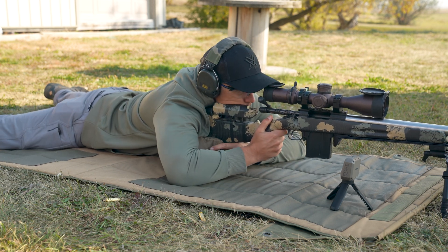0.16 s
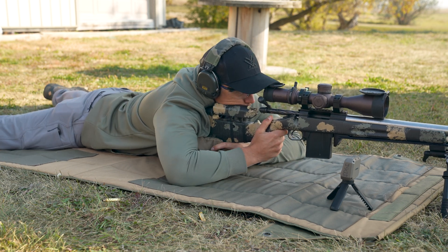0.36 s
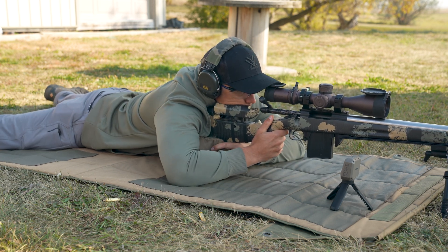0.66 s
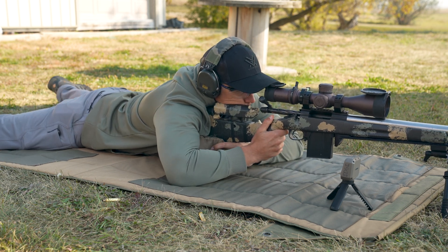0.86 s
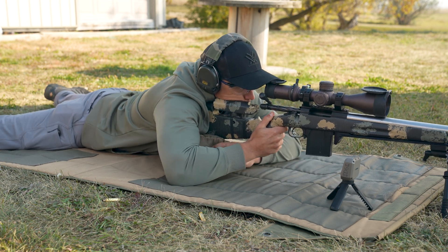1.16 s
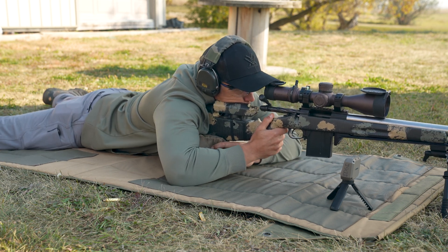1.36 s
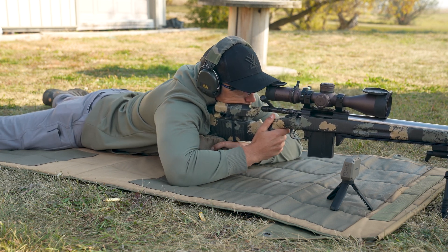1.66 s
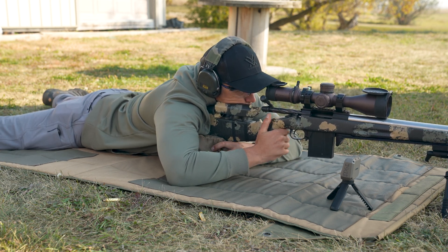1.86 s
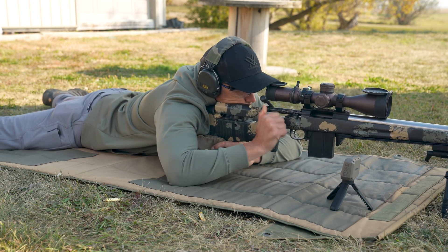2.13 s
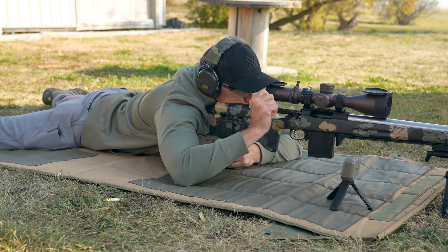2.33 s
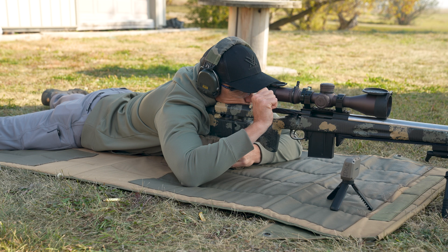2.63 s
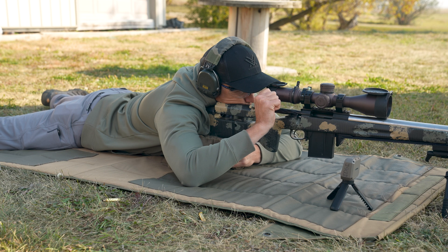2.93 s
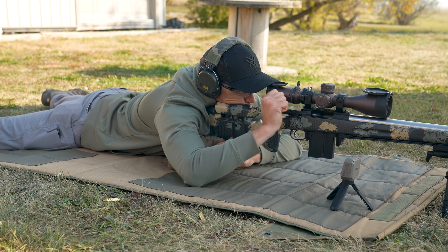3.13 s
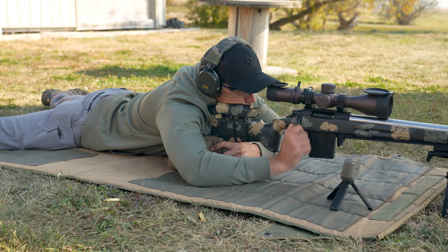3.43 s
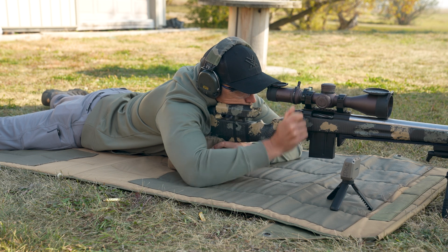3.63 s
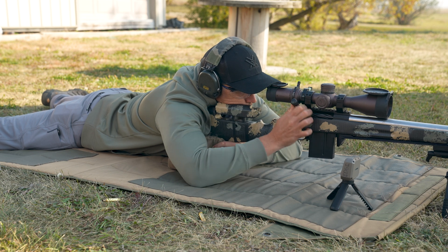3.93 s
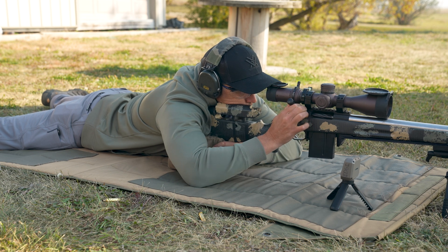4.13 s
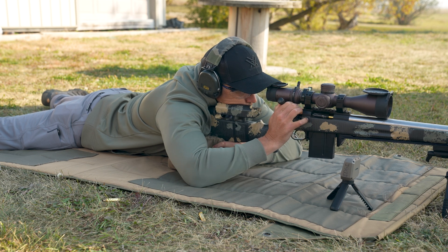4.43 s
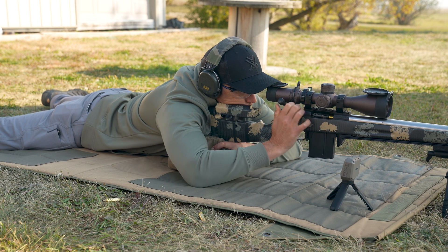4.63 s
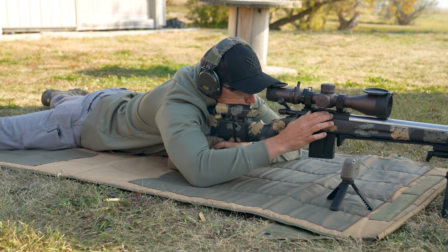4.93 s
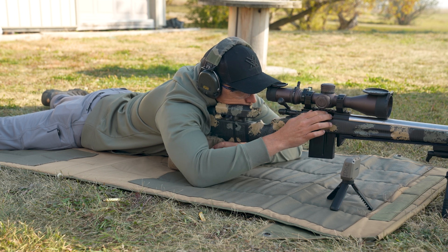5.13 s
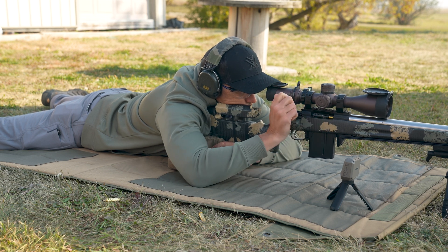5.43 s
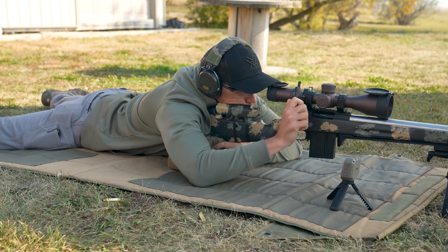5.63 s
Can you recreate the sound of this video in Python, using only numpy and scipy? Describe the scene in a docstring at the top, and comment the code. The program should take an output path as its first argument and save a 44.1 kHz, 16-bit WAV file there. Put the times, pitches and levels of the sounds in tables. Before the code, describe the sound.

A shooter lying on a mat handles a rifle close to the microphone. Mostly quiet at first: dull breeze, cloth dragging, faint fingertip taps. Then crisp steel snaps and a short rasping slide as the bolt is cycled, the loudest moment slightly overloaded. A small click comes soon after, a quiet gap, and finally two tight groups of metallic clacks. Open air, almost no echo.

```python
"""Working a rifle bolt outdoors

A prone shooter at an outdoor range works the bolt of a rifle, close to the microphone, and later works it again.
Each steel contact is a burst of micro-impacts that excites damped modes of stock, bolt and receiver.
The sliding bolt and the sleeve are stick-slip friction: noise of uneven strength, coloured by filters.
Fingers tick on the rifle between the clacks, and a faint outdoor rumble, filtered noise, lies beneath.
"""
import sys
import numpy as np
from scipy import signal
from scipy.fft import rfft, irfft, next_fast_len
from scipy.io import wavfile
from scipy.ndimage import uniform_filter1d

SR = 44100
rng = np.random.default_rng(int(sys.argv[2]) if len(sys.argv) > 2 else 0)


def materialize(psi):
    """Save the field psi as 16-bit PCM at rate SR to the path in sys.argv[1].

    A 1-D psi becomes a single channel; in a 2-D psi each row is a channel.
    """
    bounded = np.clip(np.atleast_2d(psi).T, -1, 1)
    quanta = np.round(bounded * 32767).astype(np.int16)
    wavfile.write(sys.argv[1], SR, quanta)


N = 254898  # length in samples


def from_db(db):
    """Logarithmic level: decibels to amplitude gain."""
    return 10 ** (np.asarray(db) / 20)


def rms_one(x):
    """Normalisation: scale a signal to unit rms."""
    return x / np.sqrt(np.mean(x ** 2) + 1e-20)


def filtered(x, kind, hz, order):
    """Linear filtering: a causal Butterworth filter."""
    return signal.sosfilt(signal.butter(order, hz, kind, fs=SR, output="sos"), x)


def band(x, low_hz, high_hz, order=2):
    """Band limitation: keep what lies between two frequencies."""
    return filtered(x + 1e-18, "band", [low_hz, min(high_hz, .45 * SR)], order)


def coloured(x, spectrum):
    """Spectral shaping: give a noise a smooth spectrum and unit rms."""
    hz, db = np.transpose(spectrum)
    size = next_fast_len(N)
    f = np.maximum(np.fft.rfftfreq(size, 1 / SR), 1)
    gain = from_db(np.interp(np.log(f), np.log(hz), db))
    gain = gain * np.minimum(f / hz[0], 1) ** 2  # falls off below the lowest listed frequency
    return rms_one(irfft(rfft(x, size) * gain, size)[:N])


def grainy(grain_db, grain_s):
    """Stick-slip friction: noise whose strength jumps as asperities catch and let go."""
    catch = rms_one(uniform_filter1d(rng.standard_normal(N), max(int(grain_s * SR), 1)))
    strength = from_db(grain_db * np.clip(catch, -2, 2))
    return rms_one(rng.standard_normal(N) * strength)


def resonance(x, hz, width_hz):
    """Damped resonance: a two-pole filter with gain 1 at its peak."""
    r = np.exp(-np.pi * width_hz / SR)
    numerator = np.array([1, 0, -1]) * (1 - r * r) / 2
    return signal.lfilter(numerator, [1, -2 * r * np.cos(2 * np.pi * hz / SR), r * r], x + 1e-18)


def add(track, s, sound):
    """Superposition: mix a short sound into a track at a time."""
    i = round(s * SR)
    track[i:i + len(sound)] += sound[:max(N - i, 0)]


def swells(times, levels_db, rises_s, falls_s, hold_s):
    """Exponential growth and decay: gain of movements that each speed up, hold and die away."""
    t, gain = np.arange(N) / SR, np.zeros(N)
    for s, db, rise, fall in zip(times, levels_db, rises_s, falls_s):
        distance = np.maximum((s - t) / rise, (t - s - hold_s) / fall)
        gain += from_db(db - 20 * np.clip(distance, 0, 10))
    return gain


# Spectrum of the open air. Each row: frequency in Hz, relative density in dB per Hz.
OUTDOOR_SPECTRUM = [(25, -7), (70, -9), (130, -7.5), (200, -12), (300, -20), (430, -17.5), (700, -22),
                    (1400, -32), (3000, -32.5), (8000, -36.5), (16000, -38)]
OUTDOORS_DB = -56


def outdoor_air():
    """Stationary random noise: the open air is a steady coloured noise."""
    return from_db(OUTDOORS_DB) * coloured(rng.standard_normal(N), OUTDOOR_SPECTRUM)


# Spectrum shared by breeze and mat. Each row: frequency in Hz, relative density in dB per Hz.
RUMBLE_SPECTRUM = [(15, -41), (25, -5.5), (70, -1.5), (156, -10), (388, -10.5), (659, -22.5), (718, -24.5),
                   (1500, -28.5), (1950, -66), (3300, -120)]
BREEZE_DB = -56


def rumble(mat):
    """Addition of power: a steady breeze and the arm moving on the mat share one low noise."""
    return np.hypot(mat, from_db(BREEZE_DB)) * coloured(rng.standard_normal(N), RUMBLE_SPECTRUM)


# Shifts of the shooter's arm. Each row: time of fastest movement in seconds, rustle level in dB,
# rustle treble in dB over that, rumble on the mat in dB, rise and fall in seconds per 20 dB.
ARM_MOVES = [(.1, -59.5, -5, -47, 0.19, 0.22), (.42, -62, 3, -49, 1, 0.94),
             (1.038, -50.5, 4, -61, .11, 0.12), (1.22, -59, -2.5, -57, 0.39, 1.6),
             (1.84, -70, 4, -54, .25, 0.03), (2.46, -51, -11, -49.5, 0.27, 0.23),
             (3.29, -70.5, -0.5, -48.5, .12, 1.36), (3.87, -61, -3.5, -59.5, .15, 0.2),
             (4.19, -59.5, -6, -62.5, .1, 0.4), (5.7, -56, 0, -47, .4, 2)]
MOVE_HOLD_S = .008


def arm_moves():
    """Common cause: each move of the arm drives rustle, treble of the rustle, and mat rumble together."""
    times, rustle_db, treble_db, mat_db, rise_s, fall_s = np.transpose(ARM_MOVES)
    levels = (rustle_db, rustle_db + treble_db, mat_db)
    return [swells(times, db, rise_s, fall_s, MOVE_HOLD_S) for db in levels]


# Spectrum of dragged cloth. Each row: frequency in Hz, relative density in dB per Hz.
CLOTH_SPECTRUM = [(150, 3.5), (500, 10), (1500, -1.5), (2900, 0), (5000, -7.5), (10000, -6.5),
                  (15000, -14.5)]
SLEEVE_REST_DB = -69.5  # the cloth never lies quite still
SLEEVE_TREBLE_HZ = 4200  # above this the rustle has its own level for each move


def sleeve(arm, treble):
    """Sliding friction: cloth drags over the mat, dull and bright parts each at their own level."""
    cloth = coloured(grainy(grain_db=1.5, grain_s=.003), CLOTH_SPECTRUM)
    low = filtered(cloth, "low", SLEEVE_TREBLE_HZ, order=3)
    high = filtered(cloth, "high", SLEEVE_TREBLE_HZ, order=3)
    rest = from_db(SLEEVE_REST_DB)
    return np.hypot(arm, rest) * low + np.hypot(treble, rest) * high


# Strokes of the hand on the bolt, played here and by bolt_slide. Each row: time of greatest effort in seconds,
# scrape level in dB, shudder level in dB, rise and fall in seconds per 20 dB.
BOLT_STROKES = [(3.155, -53, -38, 0.09, 0.33), (3.238, -16.5, -22, 0.029, 0.05),
                (3.422, -48, -46, 0.018, 0.26)]
STROKE_HOLD_S = .01
SHUDDER_LAG_S = .02  # the rifle rocks after the push
ROCKING_PER_RUSTLE_DB = -3  # a moving arm also rocks the rifle


def shudder(arm):
    """Forced vibration: the rifle shudders on its rest under each stroke and each move of the arm."""
    times, _, shudder_db, rise_s, fall_s = np.transpose(BOLT_STROKES)
    effort = swells(times + SHUDDER_LAG_S, shudder_db, rise_s, fall_s, STROKE_HOLD_S)
    effort = effort + from_db(ROCKING_PER_RUSTLE_DB) * arm
    rocking = rms_one(resonance(rng.standard_normal(N), hz=101, width_hz=42))
    flexing = rms_one(resonance(rng.standard_normal(N), hz=203, width_hz=18))
    return effort * rms_one(band(rocking + from_db(-4.5) * flexing, 50, 400))


# Taps and shifts of the fingers. Each row: start in seconds, clack level in dB, hardness (edge tick) and
# weight (stock thump) in dB over the clack, favoured stock pitch in Hz.
FINGER_TAPS = [(0.068, -52, 3.5, -11.5, 430), (0.164, -46.5, 4, -10, 270), (0.955, -61, 8, -6, 180),
               (1.768, -65.5, -11, 20, 1000), (1.814, -59, 5, -3, 1000), (1.838, -52, 3, 10, 1000),
               (1.862, -53, 4, 12.5, 990), (1.876, -58, 3, 6, 1000), (2.501, -45.5, -26, 13, 400),
               (2.528, -41.5, -26, 2, 340), (2.546, -49.5, -28, 11, 720), (2.84, -42.5, -19, 7.5, 337),
               (3.126, -49, -7, 3, 191), (3.151, -48, -1, 17.5, 205), (3.888, -50, -21, -0.5, 301),
               (3.907, -51, -9, -3.5, 293), (3.991, -60, -12, 14, 340), (4.014, -67, -7, 22, 340),
               (4.176, -46, -30.5, 10, 634), (4.187, -50, -20, 2, 630), (4.257, -49.5, -34, -1, 626),
               (4.274, -39, -19, -3, 331), (4.371, -30, -2.5, -23, 483), (4.41, -55.5, -13, 19, 450)]
# A heavier tap stays longer in contact and rings lower. Each row: weight in dB, favoured steel pitch in Hz.
TAP_PITCHES = [(-11.5, 3900), (4, 1073)]
# Steel meets steel as the bolt lifts, slides back to its stop, runs forward and locks, and is worked again.
# Each row: start in seconds, clack level in dB, hardness and weight in dB over the clack,
# favoured stock pitch in Hz and favoured steel pitch in Hz, both set by the spot that is struck.
BOLT_BLOWS = [ (2.968, -22, -4, -7.5, 344, 2280), (3.189, -27, -6.5, 0, 635, 2030),
              (3.238, -16.5, 0, -10.5, 450, 3070), (3.2447, -9.5, -3, -12.5, 342, 4650),
              (3.2623, -24.5, 4.5, 5, 700, 2600), (3.299, -17.5, -8, -9.5, 464, 2130),
              (3.3118, -7, -0.5, -24, 182, 9080), (3.4288, -15, 5.5, -11, 205, 9930),
              (3.4313, -15.5, -1, -11, 200, 2051), (3.441, -24, 3, 2, 200, 6600),
              (3.448, -29.5, 5.5, 2.5, 188, 12300), (3.493, -36, -5, -7.5, 202, 2280),
              (3.4993, -10, 1, -1.5, 156.6, 2968), (3.589, -45.5, -15, -10, 120, 2150),
              (3.614, -34, -0.5, -7.5, 162, 1955), (3.645, -46, -12, -19, 580, 2140),
              (3.7138, -19.5, 3, -7.5, 205, 9880), (3.7163, -19.5, -14, -2, 446, 2180),
              (3.734, -15.5, -14.5, -9, 217, 3590), (3.7511, -15.5, 3, -24.5, 200, 12660),
              (3.7558, -13.5, 0, -3, 345, 8240), (3.762, -26, 5.5, 8, 210, 3230),
              (5.54, -28.5, -13.5, -4, 199, 2050), (5.6063, -19.5, -18.5, -20, 590, 2220),
              (5.611, -21.5, -19, -31, 593, 1900), (5.623, -29.5, -15, 1, 600, 2000),
              (5.64, -28.5, -6.5, 7, 345, 2130), (5.65, -14.5, -17, -29, 360, 6900),
              (5.6521, -9.5, 2.5, -7, 660, 6790), (5.66, -25, -4, -10.5, 705, 2090),
              (5.7725, -17.5, 7.5, -8, 205, 11630), (5.776, -13.5, 1, -37, 1000, 9500)]
# Losses of the three rebounds. Each entry: loss in dB from the touch before.
REBOUND_STEPS = [22.5, 10.5, 7.5]
REBOUND_MIN_S, REBOUND_MAX_S, REBOUND_WEIGHT_DB = .006, .016, -8


def contacts():
    """Inelastic rebound: after each blow the loose bolt touches again, ever weaker; taps do not rebound."""
    taps, bounce = np.array(FINGER_TAPS), np.array(BOLT_BLOWS)
    tap_steel_hz = np.interp(taps[:, 3], *np.transpose(TAP_PITCHES))
    rows = [bounce, np.c_[taps, tap_steel_hz]]
    for loss_db in REBOUND_STEPS:
        bounce = bounce.copy()
        bounce[:, 0] += REBOUND_MIN_S + (REBOUND_MAX_S - REBOUND_MIN_S) * rng.random(len(bounce))
        bounce[:, 1] -= loss_db
        bounce[:, 3] = REBOUND_WEIGHT_DB
        rows.append(bounce)
    return np.vstack(rows)


def push(times, levels_db, contact_s):
    """Impulse: the momentum of each blow passes in one smooth pulse of force."""
    t, out = np.arange(SR // 50) / SR, np.zeros(N)
    pulse = t / contact_s * np.exp(-t / contact_s)
    for s, db in zip(times, levels_db):
        add(out, s, from_db(db) * pulse / pulse.sum())
    return out


# Modes of stock and chassis. Each row: frequency in Hz, relative level in dB, 60 dB decay time in seconds.
STOCK_MODES = [(77, -12, .07), (124, -3, 0.14), (146.4, -1.5, 0.051), (201.2, -3.5, 0.15),
               (250, -7.5, 0.058), (340, -8.5, 0.08), (450, -11.5, 0.12), (633, -14.5, 0.16),
               (694, -19, .2), (824, -19.5, .04), (960, -21, 0.055)]
SPOT_LOSS_DB_PER_OCTAVE = 2.5  # modes far from the favoured pitch are rung less


def stock(times, thump_db, favoured_hz, favour_db, spread_octaves, scatter_db):
    """Modal excitation: a blow rings every stock mode, favouring those near the pitch of its spot."""
    out = np.zeros(N)
    chance = rng.standard_normal((len(times), len(STOCK_MODES)))
    for k, (hz, db, t60) in enumerate(STOCK_MODES):
        octaves = np.abs(np.log2(hz / favoured_hz))
        spot_db = favour_db * np.exp(-(octaves / spread_octaves) ** 2) - SPOT_LOSS_DB_PER_OCTAVE * octaves
        blow_db = thump_db + db + spot_db + scatter_db * chance[:, k]
        force = push(times, blow_db, contact_s=.000094)
        r, w = from_db(-60 / (t60 * SR)), 2 * np.pi * hz / SR
        ring = signal.lfilter([0, np.sin(w)], [1, -2 * r * np.cos(w), r * r], force + 1e-18)
        out += (-1) ** k * ring  # neighbouring modes have opposite sign
    return out


def chatter(times, levels_db, low_hz, high_hz, rise_s, length_s, abruptness):
    """Repeated impact: loose parts meet in a burst of micro-impacts that stops within milliseconds."""
    t, out = np.arange(SR // 20) / SR, np.zeros(N)
    envelope = (1 - np.exp(-t / rise_s)) * np.exp(-(t / length_s) ** abruptness)
    bursts = band(rng.standard_normal((len(times), len(t))) * envelope, low_hz, high_hz, order=3)
    for s, db, burst in zip(times, levels_db, bursts):
        unit_burst = burst * np.sqrt(.004 * SR / np.sum(burst ** 2))  # energy of 4 ms at unit rms
        add(out, s, from_db(db) * unit_burst)
    return out


def pings(times, levels_db, pitches_hz, t60_s, rise_s):
    """Free vibration: the small part that is hit rings at its own pitch; high pitches die sooner."""
    t, out = np.arange(SR // 12) / SR, np.zeros(N)
    for s, db, hz in zip(times, levels_db, pitches_hz):
        decay = from_db(-60 * t / t60_s * (hz / 2000) ** 0.27)  # t60_s holds at 2000 Hz
        envelope = (1 - np.exp(-t / rise_s)) * decay
        add(out, s, from_db(db) * envelope * np.sin(2 * np.pi * hz * t))
    return out


# Resonances of bolt and receiver. Each row: frequency in Hz, width in Hz, relative level in dB.
STEEL_MODES = [(1990, 380, -1.5), (2256, 39, -3.5), (2520, 65, -15), (2630, 99, -6.5), (3040, 160, -8),
               (3400, 52, -9), (3440, 230, -4), (4750, 330, 4.5), (5180, 190, -5), (5580, 24, -2),
               (6244, 98, -3), (7000, 320, 5), (8300, 230, -8), (9080, 290, 5), (9750, 37, -6.5),
               (10370, 100, -1.5), (11850, 1300, -5), (12600, 333, -7), (14200, 170, -10), (15600, 220, -4)]


def steel(force, direct_db, ring_db, dip_hz=4000, dip_width_hz=550):
    """Resonant radiation: the contact noise plus the short ring of bolt and receiver, damped by the hand."""
    force = force - 0.72 * resonance(force, dip_hz, dip_width_hz)  # antiresonance between two groups of modes
    rings = np.zeros(N)
    for k, (hz, width_hz, db) in enumerate(STEEL_MODES):
        rings += (-1) ** k * from_db(db) * resonance(force, hz, width_hz)
    return from_db(direct_db) * force + from_db(ring_db) * rings


# heavy, soft contacts knock the stock most: dB of knock per dB of weight and per dB of hardness
KNOCK_PER_WEIGHT, KNOCK_PER_HARDNESS = .5, -.22


def clacks():
    """Impact spectrum: weight and hardness share each contact between stock thump, knock and steel."""
    times, clack_db, hardness_db, weight_db, stock_hz, steel_hz = contacts().T
    thump_db, tick_db = clack_db + weight_db, clack_db + hardness_db
    knock_db = clack_db + KNOCK_PER_WEIGHT * weight_db + KNOCK_PER_HARDNESS * hardness_db
    thump = from_db(1.0) * stock(times, thump_db, stock_hz, favour_db=9.5, spread_octaves=.13, scatter_db=2.0)
    knock = from_db(2.0) * chatter(times, knock_db, low_hz=343, high_hz=1060,
                                   rise_s=.0012, length_s=.0046, abruptness=1.0)
    clack = from_db(0.78) * chatter(times, clack_db, low_hz=1750, high_hz=4860,
                                    rise_s=.0012, length_s=.0021, abruptness=.94)
    tick = from_db(0.3) * chatter(times, tick_db, low_hz=4630, high_hz=17000,
                                  rise_s=.00069, length_s=.00097, abruptness=.72)
    # a ping is as strong as the part of the blow that lies at its pitch
    ping_db = np.select([steel_hz < 1400, steel_hz < 5000], [knock_db - 8.5, clack_db + 0.5], tick_db)
    ping = from_db(9.5) * pings(times, ping_db, steel_hz, t60_s=.017, rise_s=.001)
    return thump + knock + ping + steel(clack + tick, direct_db=-4.0, ring_db=0)


# Spectrum of the scraping bolt. Each row: frequency in Hz, relative density in dB per Hz.
SCRAPE_SPECTRUM = [(400, -3), (900, -1.5), (1450, -3.5), (2100, -1), (2700, 2.5), (3300, -2.5), (4000, -6),
                   (4700, -6.5), (6500, -9), (9000, -18.5), (15000, -18)]
RASP_DB, RASP_LAG_S = -12.5, .015  # the bolt body rasps along with the scrape, a little later


def bolt_slide():
    """Friction-driven resonance: the bolt scrapes along its raceway and its body rasps."""
    times, scrape_db, _, rise_s, fall_s = np.transpose(BOLT_STROKES)
    scrape_noise = coloured(grainy(grain_db=5.0, grain_s=.0018), SCRAPE_SPECTRUM)
    scrape = swells(times, scrape_db, rise_s, fall_s, STROKE_HOLD_S) * scrape_noise
    # the rasp is held longer, and is the stronger the harder the bolt is pulled
    rasp_db = scrape_db + RASP_DB + .3 * (scrape_db - scrape_db.max())
    friction = swells(times + RASP_LAG_S, rasp_db, rise_s, fall_s, hold_s=.028)
    rasp = friction * rms_one(resonance(grainy(grain_db=3.5, grain_s=.001), hz=2640, width_hz=350))
    return steel(scrape, direct_db=-1.0, ring_db=-4.5) + band(rasp, 1900, 3400)


def surroundings(x, wet_db, t60_s, delay_s, top_hz):
    """Diffuse scattering: ground, bench and shooter return a short, weak tail."""
    t = np.arange(SR // 2) / SR
    decay = from_db(-60 * t / t60_s) * (1 - np.exp(-(t / delay_s) ** 2))
    tail = rng.standard_normal(len(t)) * decay
    tail = filtered(tail / np.sqrt(np.sum(tail ** 2)), "low", min(top_hz, .45 * SR), order=1)
    return from_db(wet_db) * signal.fftconvolve(x, tail)[:N]


def scene():
    """Superposition: open air, sleeve, rifle and the scattered tail of the rifle add up."""
    arm, treble, mat = arm_moves()
    background = outdoor_air() + rumble(mat)
    rifle = shudder(arm) + clacks() + bolt_slide()
    tail = surroundings(rifle, wet_db=-27.5, t60_s=.084, delay_s=.016, top_hz=9000)
    return (background + sleeve(arm, treble) + rifle + tail)[None]


CUTOFF_HZ = 15900


def record(dry):
    """Saturation and band limit: the hardest clacks overload the recorder; the top is cut."""
    clipped = dry / (1 + dry ** 8) ** (1 / 8)
    return signal.sosfilt(signal.ellip(10, .2, 80, CUTOFF_HZ, fs=SR, output="sos"), clipped)


dry = scene()
out = record(dry)
materialize(out)
```